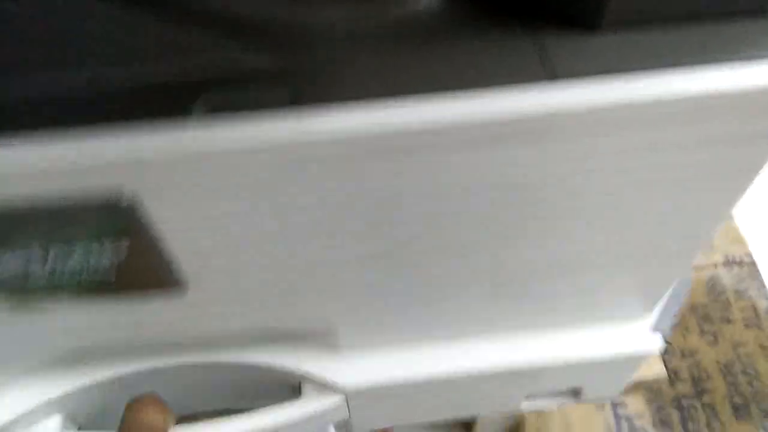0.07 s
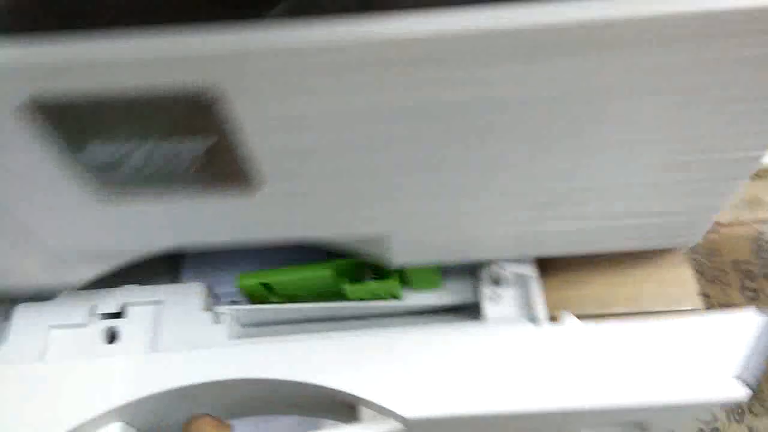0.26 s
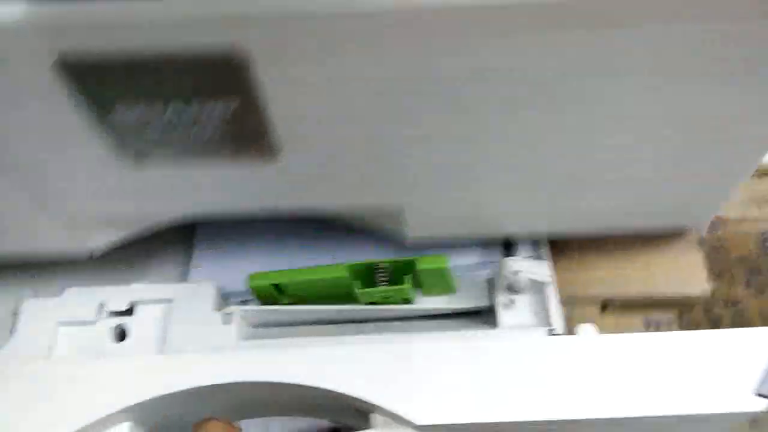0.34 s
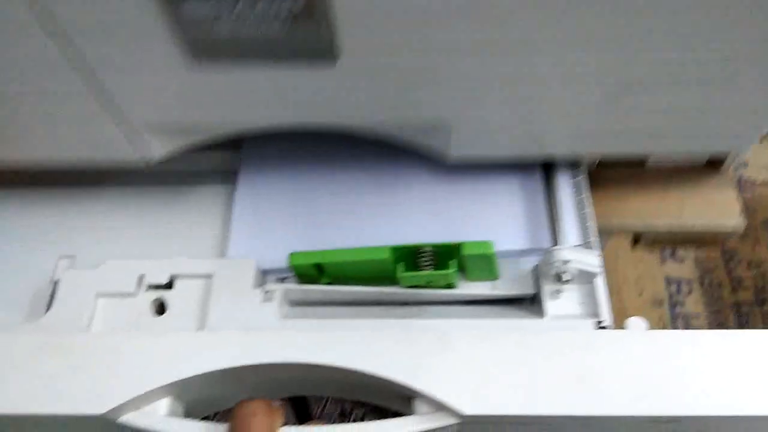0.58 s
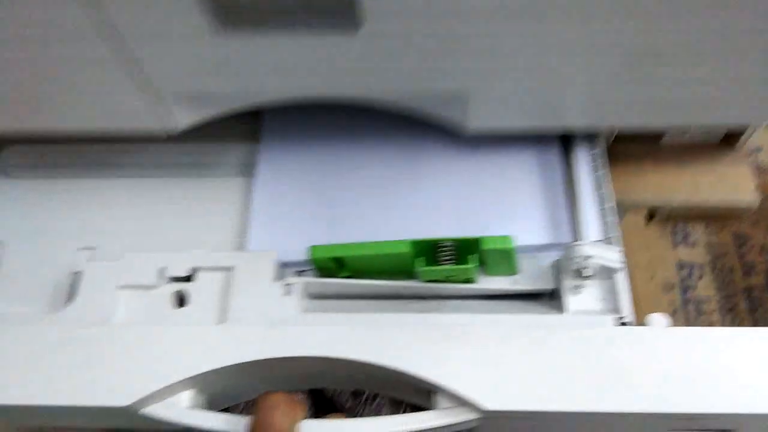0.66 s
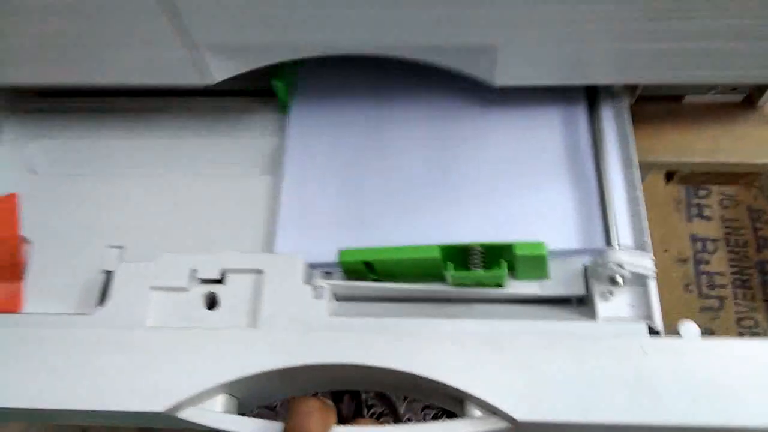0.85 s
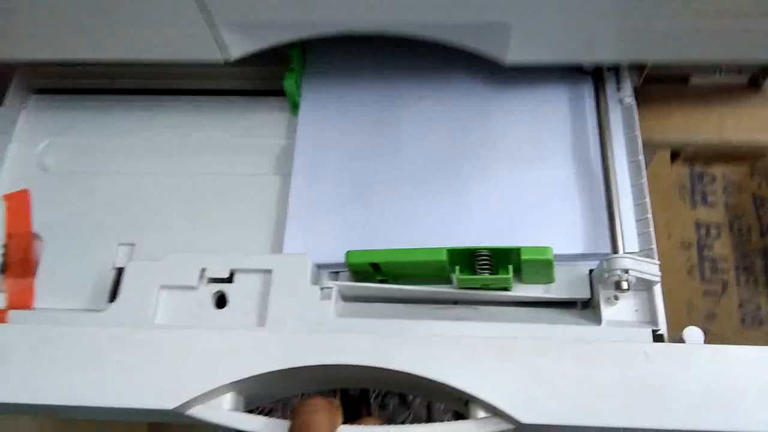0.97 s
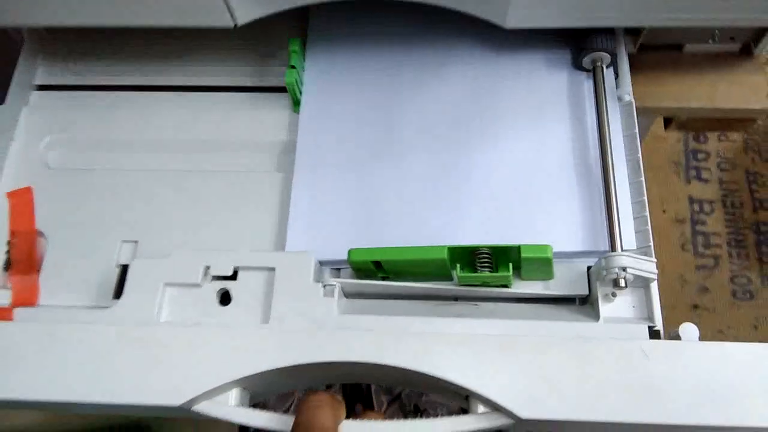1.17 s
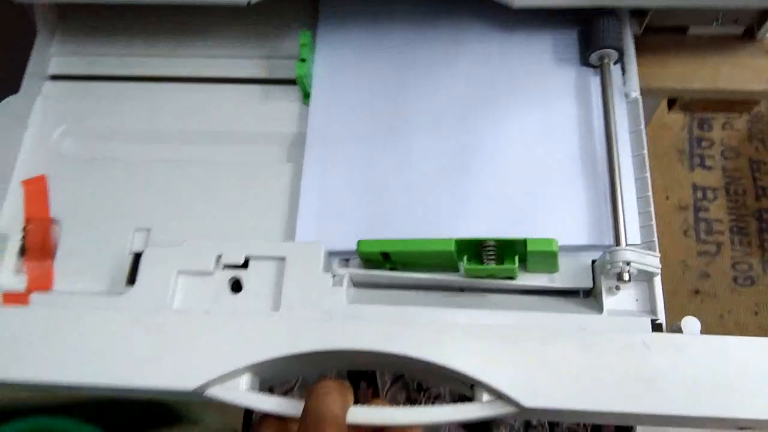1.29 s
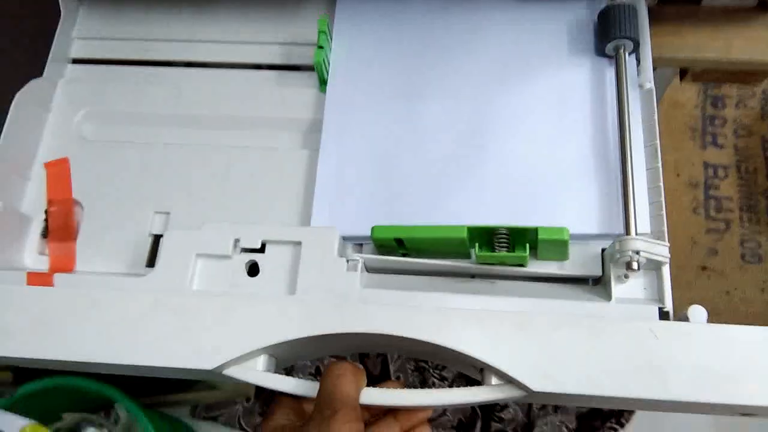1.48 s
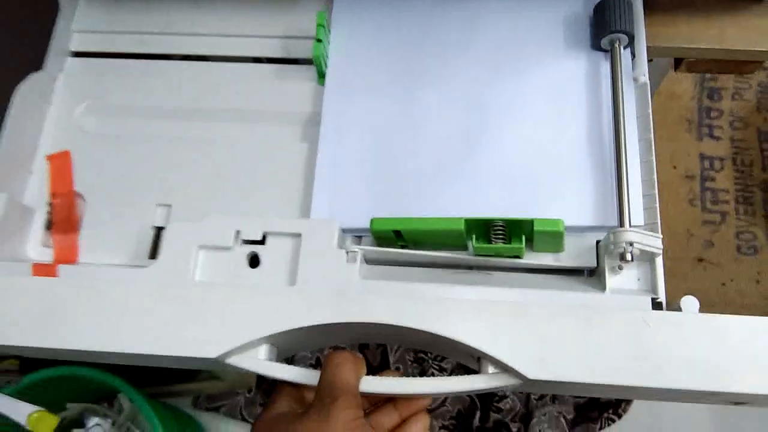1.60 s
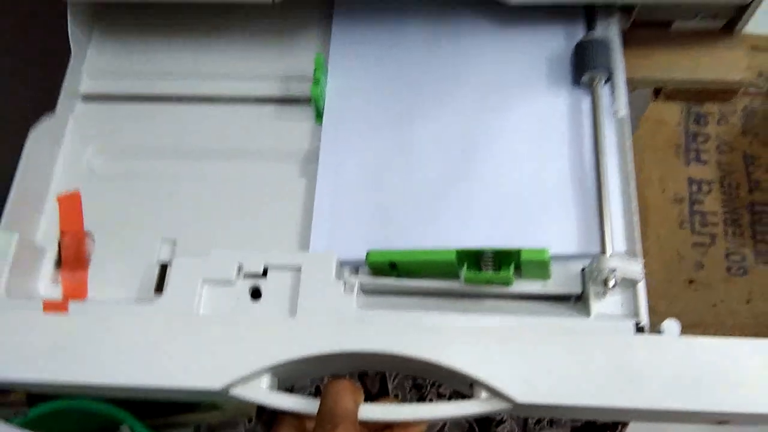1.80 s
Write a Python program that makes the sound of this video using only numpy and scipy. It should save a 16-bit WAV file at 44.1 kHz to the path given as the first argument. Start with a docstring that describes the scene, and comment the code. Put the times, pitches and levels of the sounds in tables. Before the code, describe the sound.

A plastic paper tray is pulled open with a clatter, a scraping slide and a clunk.

```python
"""Pulling out a copier's paper tray

A plastic tray is drawn from an office copier, heard from just above in a small, quiet room.
The handle shifts and the latch lets go with a clatter. The tray rubs along its rails, knocks over
their joints, clunks against the stop and creeps out the last bit. Impacts and friction excite
the resonances of the plastic, and the hollow cabinet booms underneath."""
import sys
import numpy as np
from scipy import signal
from scipy.fft import rfft, irfft
from scipy.io import wavfile

SR = 44100
rng = np.random.default_rng(int(sys.argv[2]) if len(sys.argv) > 2 else 0)


def int16_out(signal):
    """Quantize to a 16-bit WAV file."""
    q = np.round(np.clip(np.atleast_2d(signal).T, -1, 1) * 32767)
    wavfile.write(sys.argv[1], SR, q.astype(np.int16))


N = 81585
TREBLE_HZ, CUTOFF_HZ = 2800, 9700   # where the treble begins and ends


def from_db(db):
    """Decibels are logarithmic: 20 dB is a tenfold amplitude."""
    return 10 ** (np.asarray(db) / 20)


def rms_one(x):
    """Normalisation to unit mean power."""
    return x / np.sqrt(np.mean(x ** 2) + 1e-20)


def seconds():
    """Uniform sampling: the time of each sample."""
    return np.arange(N) / SR


def decay(t60):
    """Damping: an exponential fall of 60 dB in t60 seconds."""
    return from_db(-60 * seconds() / t60)


def add(out, start, x):
    """Superposition: x joins out from start seconds on."""
    i = max(int(start * SR), 0)
    out[i:] += x[:N - i]


def response(points, size=4096):
    """Minimum phase: folding the cepstrum turns a spectrum into a causal impulse response."""
    hz, db = np.transpose(points)
    f = np.maximum(np.arange(size // 2 + 1) * SR / size, 1)
    rolloff_db = 40 * np.log10(np.maximum(f / CUTOFF_HZ, 1))
    level = np.interp(np.log(f), np.log(hz), db) - rolloff_db
    cepstrum = irfft(np.log(from_db(level)))
    cepstrum[1:size // 2] *= 2
    cepstrum[size // 2 + 1:] = 0
    return irfft(np.exp(rfft(cepstrum)))


def colour(x, points):
    """Convolution with a unit-energy response shapes white sound and keeps its power."""
    h = response(points)
    return signal.fftconvolve(x, h / np.linalg.norm(h))[:N]


def shelf(x, hz, db, side):
    """A shelving filter raises or lowers everything on one side of hz."""
    spread = from_db(db / 4) ** (1 if side == "low" else -1)
    roots = 2 * np.pi * hz * np.exp(np.array([3j, -3j]) * np.pi / 4)   # Butterworth pair
    top_gain = 1 if side == "low" else from_db(db)
    z, p, k = signal.bilinear_zpk(roots * spread, roots / spread, top_gain, SR)
    return signal.lfilter(*signal.zpk2tf(z, p, k), x)


def ring(hz, t60):
    """Free vibration: a struck mode is a damped sine."""
    return decay(t60) * np.sin(2 * np.pi * hz * seconds())


def resonance(x, hz, width):
    """Forced vibration: a resonator passes a band around hz with peak gain 1."""
    r = np.exp(-np.pi * width / SR)
    feedback = [1, -2 * r * np.cos(2 * np.pi * hz / SR), r * r]
    return signal.lfilter(np.array([1, 0, -1]) * (1 - r * r) / 2, feedback, x)


def drift(hz):
    """Low-passed noise is a slow random fluctuation, here of rms 1."""
    return rms_one(signal.sosfilt(signal.butter(2, hz, fs=SR, output="sos"), rng.standard_normal(N)))


def blow(t60, rise_s):
    """An impact's envelope: the crack, the plastic's ring and the room's reverberation add in power."""
    rise = 1 - np.exp(-seconds() / rise_s)
    crack = from_db(2.5) * np.exp(-seconds() / 0.0019)
    room_tail = from_db(-13.5) * decay(t60=0.54)
    return rise * np.sqrt(crack ** 2 + decay(t60) ** 2 + room_tail ** 2)


def room_tone():
    """Stationary noise gives the office its low hum and faint hiss."""
    # The background spectrum. Each row: frequency in Hz, relative density in dB.
    spectrum = [(25, -19.5), (38, -10), (50, 9.5), (65, -10.5), (90, -29), (120, -11), (250, -16.5),
                (500, -12.5), (1500, -18), (2500, -29), (5000, -37.5), (9000, -37)]
    return from_db(-78) * colour(rng.standard_normal(N), spectrum)


def cabinet(rise_s=0.012, detune=0.011):
    """Panel vibration: each jolt from the tray's weight makes the cabinet's modes boom and rumble."""
    # The jolts. Each row: start in seconds, level in dB, bias of deepest mode over highest in dB.
    jolts = [(0.056, -71.5, 5), (0.22, -41, -31.5), (.298, -41.5, 2.5), (0.349, -49, 5.5),
             (0.462, -51.5, 1), (.54, -56.5, 3.5), (.635, -58, 0.5), (0.786, -66, -6.5), (0.901, -65, -19),
             (0.996, -53, 6), (1.06, -51.5, 2), (1.11, -67, 11), (1.344, -84, 20.5)]
    # The cabinet's modes. Each row: frequency in Hz, relative level in dB, T60 in seconds.
    modes = [(51, -5.5, 0.29), (70, -6.5, .25), (114, -1.5, 0.18), (160.7, 4.5, 0.23)]
    # The loose panels' spectrum. Each row: frequency in Hz, relative density in dB.
    rumble = [(40, -15), (75, -11.5), (130, 4.5), (200, -6), (300, 2.5), (380, -11.5), (700, -38.5)]
    boom, shudder, t = np.zeros(N), np.zeros(N), seconds()
    swing = 1 - np.exp(-t / rise_s)
    for (hz, mode_db, t60), depth in zip(modes, np.linspace(1, 0, len(modes))):
        envelope = swing * decay(t60)
        for start, db, deep_db in jolts:
            pitch = hz * (1 + detune * rng.standard_normal())
            tone = np.sin(2 * np.pi * (pitch * t + rng.random()))
            add(boom, start, from_db(db + mode_db + depth * deep_db) * envelope * tone)
    envelope = from_db(-2) * swing * decay(t60=0.25)
    for start, db, _ in jolts:
        add(shudder, start, from_db(db) * envelope * rng.standard_normal(N))
    return boom + colour(shudder, rumble)


def handle():
    """Soft impacts excite the handle's resonance as the fingers take up its play."""
    # The dull taps. Each row: start in seconds, level in dB.
    taps = [(0.034, -60), (0.0424, -50.5), (.054, -49.5), (.064, -54), (0.074, -54), (.101, -63.5)]
    # The handle's spectrum. Each row: frequency in Hz, relative density in dB.
    spectrum = [(50, -23.5), (150, -7), (400, -7.5), (600, 6.5), (900, 0.5), (1150, 1.5), (1500, -11.5),
                (1800, -9), (2150, -35), (3000, -63)]
    bursts, envelope = np.zeros(N), blow(t60=0.15, rise_s=0.001)
    for start, db in taps:
        add(bursts, start, from_db(db) * envelope * rng.standard_normal(N))
    body = colour(bursts, spectrum)
    return body + from_db(2.5) * resonance(body, hz=876, width=22)


def singing():
    """Friction drives single resonances, which swell and fade as the tray passes."""
    # The swells. Each row: middle and length in seconds, frequency and bandwidth in Hz, level in dB.
    swells = [(0.329, 0.3, 311, 7.5, -50.5), (0.438, 0.23, 1455, 130, -50.5), (.64, 0.32, 426, 600, -57.5),
              (0.8, 0.18, 4190, 320, -53.5), (0.926, 0.051, 2466, 150, -46), (.93, 0.077, 234, 90, -55.5),
              (1.276, 0.22, 939, 33, -62.5), (1.27, 0.31, 1985, 89, -58), (1.314, .26, 2425, 70, -59),
              (1.294, 0.32, 4875, 47, -63), (1.296, .28, 1590, 280, -60), (1.575, 0.26, 1527, 54, -74.5)]
    out = np.zeros(N)
    for middle, length, hz, width, db in swells:
        swell = np.cos(np.pi * np.clip((seconds() - middle) / length, -.5, .5))
        band = resonance(rng.standard_normal(N), hz, width)
        out += from_db(db) * swell * rms_one(resonance(band, hz, 2 * width))
    return out


def slide(slips_per_s=1200, slip_spread_db=2, rub_db=2, judder_db=0.52):
    """Stick-slip friction: tiny slips and smooth rubbing set the rails ringing."""
    # The course of the pull. Each row: time in seconds, level in dB, treble gain in dB.
    pull = [(.17, -80, -21), (0.223, -42.5, 5.5), (0.329, -51.5, 12), (.405, -41.5, 0.5),
            (.425, -51.5, 9.5), (0.461, -44, 4), (.54, -48.5, 4), (0.601, -44, 0), (.66, -40.5, -4.5),
            (0.771, -46.5, 2.5), (.82, -50.5, 2), (0.899, -56, 4.5), (0.924, -46.5, 7.5),
            (1.02, -33.5, -10), (1.11, -51, 4.5), (1.19, -52, 6), (1.341, -55.5, 5), (1.42, -59.5, 7.5),
            (1.50, -64, 1), (1.62, -63, -2.5), (1.71, -78.5, -19.5), (1.85, -84.5, -2)]
    # The rails' broad spectrum. Each row: frequency in Hz, relative density in dB.
    spectrum = [(60, -29.5), (150, -7.5), (220, -20.5), (310, -7), (375, -34), (520, -16), (760, 1),
                (1140, 2), (1450, 1), (2360, 1), (3250, -4.5), (4000, -1), (4600, 0.5), (5600, -6),
                (7000, -15), (9000, -26.5)]
    # The rails' resonances. Each row: frequency in Hz, bandwidth in Hz, gain in dB.
    modes = [(775, 13, -1), (924, 7.3, -8), (1424, 15, 2.5), (1667, 48, 0.5), (1958, 6.7, 7.5),
             (2415, 8.6, -3.5), (3914, 22, 1), (4040, 34, -5.5), (4490, 55, 0.5), (4720, 30, 1),
             (4920, 28, 4)]
    # The half-open tray hollows the rubbing with a notch. Each row: time in seconds, depth from 0 to 1.
    hollow = [(.70, 0), (.78, .6), (.89, .7), (.95, 0)]
    t = seconds()
    sizes = from_db(slip_spread_db * np.minimum(rng.exponential(1, N), 4)) * rng.choice([-1, 1], N)
    slips = rms_one(sizes * (rng.random(N) < slips_per_s / SR))
    friction = rms_one(slips + from_db(rub_db) * rng.standard_normal(N))
    judder = from_db(judder_db * drift(hz=45))
    rub = colour(friction * judder, spectrum)
    rub = rms_one(rub + sum(from_db(db) * resonance(rub, hz, width) for hz, width, db in modes))
    rub -= np.interp(t, *np.transpose(hollow)) * resonance(rub, hz=3180, width=510)
    times, level_db, treble_db = np.transpose(pull)
    low = signal.sosfiltfilt(signal.butter(2, TREBLE_HZ, fs=SR, output="sos"), rub)
    treble = from_db(np.interp(t, times, treble_db)) * (rub - low)
    return from_db(np.interp(t, times, level_db)) * (low + treble)


def end_stop(start=0.953):
    """Impulse excitation: the stop's modes ring briefly when the tray runs into it."""
    # The stop's modes. Each row: frequency in Hz, level in dB, T60 in seconds.
    modes = [(735, -37, 0.31), (1028, -46.5, 0.32), (2925, -40, 0.19), (3900, -41, .12), (4080, -37.5, .12),
             (4460, -37.5, .13), (4710, -28, .12)]
    out = np.zeros(N)
    add(out, start, sum(from_db(db) * ring(hz, t60) for hz, db, t60 in modes))
    return out


def knocks(bass_hz=450):
    """Modal response to impact: the shell's dense modes merge into noise while a few ring as tones."""
    # The tray's hard contacts. Each row: start in seconds, level in dB, treble gain in dB,
    # bass gain in dB, rise time in seconds.
    contacts = [(0.2054, -34.5, -4.5, 5.5, 0.0034), (.2145, -28, -3.5, -10, 0.0016),
                (.2255, -23, -25.5, -2, 0.0053), (.2355, -33, -15, -1.5, 0.0022),
                (.2445, -23.5, -18, -7.5, 0.0015), (.2845, -28.5, -25.5, -2.5, 0.0022),
                (.293, -31, -25, 2.5, 0.0015), (.304, -34.5, -25, -2, 0.0017), (.351, -37, 0.5, 9, 0.0052),
                (.386, -50, 7, 9, 0.0049), (.445, -48.5, 11.5, -3.5, 0.0051), (.465, -46, 5.5, 13.5, 0.003),
                (.553, -33.5, -1.5, -7.5, 0.0036), (.569, -35.5, 9.5, -13, 0.0033),
                (.6705, -39, 10, -7, 0.00075), (.676, -38, 9.5, -3.5, 0.0017), (.758, -45, 8.5, -2, 0.0031),
                (.908, -38.5, 3.5, -1, 0.0055), (.929, -43.5, 12, -3, .004), (0.9516, -31, 3.5, -14, .002),
                (.955, -27.5, 4.5, -12.5, 0.00091), (.963, -33.5, 5.5, -15, .002),
                (.977, -32.5, -9.5, -2.5, 0.0017), (.991, -40.5, 3, 12.5, 0.0016),
                (1.006, -39, 2.5, -3, 0.0024), (1.019, -43.5, 6, -15, .003),
                (1.030, -38.5, -13, 6, 0.00067), (1.065, -50.5, -2, 11.5, 0.0016),
                (1.148, -57.5, 15.5, 4, 0.0011)]
    # The spectrum of struck plastic. Each row: frequency in Hz, relative density in dB.
    shell = [(60, -27), (140, -6), (250, -7.5), (320, -7), (375, -8), (440, -6), (520, -14), (720, 2),
             (1000, 2.5), (1500, -1), (2400, -0.5), (3300, -5), (4500, 2), (5600, -8), (7500, -19.5),
             (9000, -30)]
    # The tray's distinct modes. Each row: frequency in Hz, relative level in dB, T60 in seconds.
    modes = [(311, -19, 0.27), (456.2, -27, 0.49), (601.4, -16.5, 0.13), (720.3, -18, 0.25),
             (794, -34.5, 0.75), (921, -19, 0.21), (1178, -15, 0.13), (1266, -20, 0.081),
             (1341, -8.5, 0.086), (1428, -16.5, .22), (1550.3, -12, 0.16), (1961, -23, .3), (2432, -22, .3),
             (4522, -22, 0.09)]
    out = np.zeros(N)
    rings = np.array([from_db(db) * ring(hz, t60) for hz, db, t60 in modes])
    for start, db, treble_db, bass_db, rise_s in contacts:
        strengths = from_db(2 * rng.standard_normal(len(modes))) * rng.choice([-1, 1], len(modes))
        shake = blow(t60=0.089, rise_s=rise_s) * rng.standard_normal(N)
        hit = colour(shake, shell) + strengths @ rings
        hit = shelf(hit, TREBLE_HZ, treble_db, "high")   # the contact's hardness
        hit = shelf(hit, bass_hz, bass_db, "low")   # its weight
        add(out, start, from_db(db) * hit)
    return out


def scene():
    """Mid-side stereo: the tray is straight ahead; a faint independent copy makes the two channels differ
    slightly, most in the treble."""
    # The side filter. Each row: frequency in Hz, gain into the side signal in dB.
    width = [(60, -12), (250, -10), (1000, -26.5), (2000, -45.5), (4000, -33.5), (5500, -20), (8000, -2.5)]
    mid = handle() + knocks() + end_stop() + cabinet() + slide() + singing() + room_tone()
    second_draw = from_db(-17.5) * knocks() + slide() + room_tone()
    side = signal.fftconvolve(second_draw, response(width))[:N]
    return np.array([mid + side, mid - side])


def record(dry, low_cut_hz=42):
    """Band limiting: the microphone loses the deepest bass, and the top is cut steeply."""
    thin = signal.sosfilt(signal.butter(4, low_cut_hz, "high", fs=SR, output="sos"), dry)
    return signal.sosfilt(signal.cheby2(16, 60, CUTOFF_HZ, fs=SR, output="sos"), thin)


dry = scene()
out = record(dry)
int16_out(out)
```